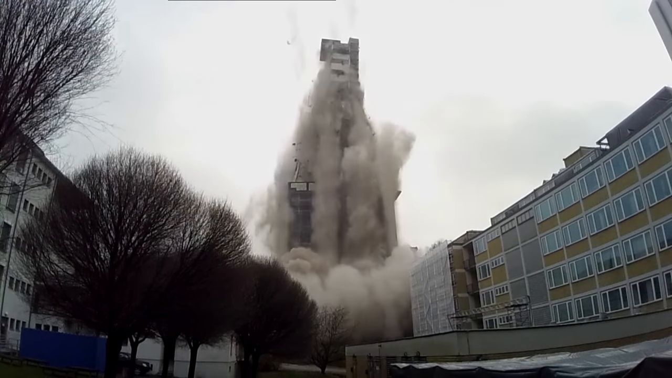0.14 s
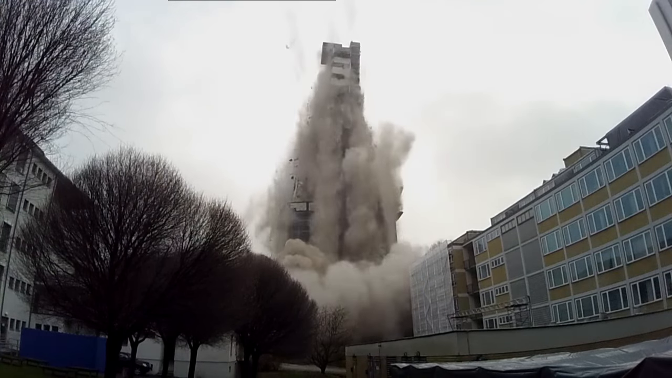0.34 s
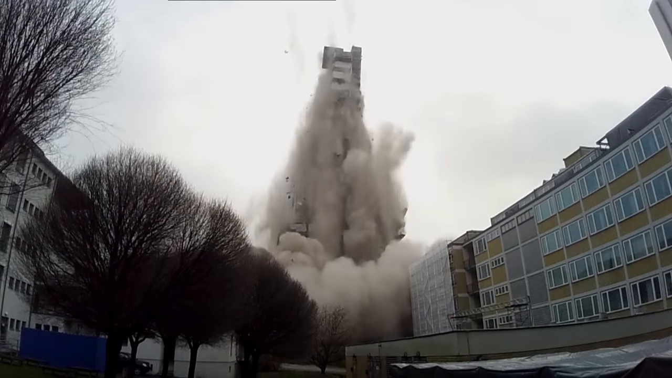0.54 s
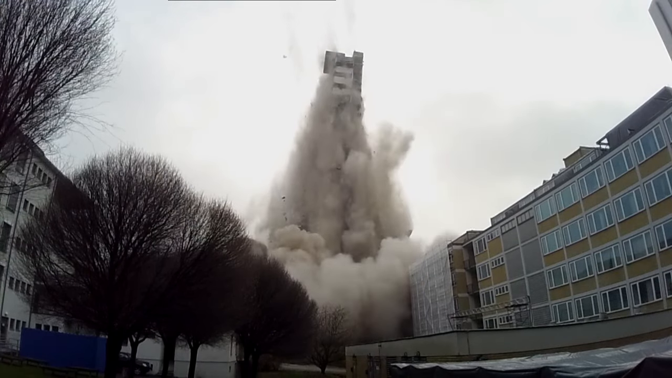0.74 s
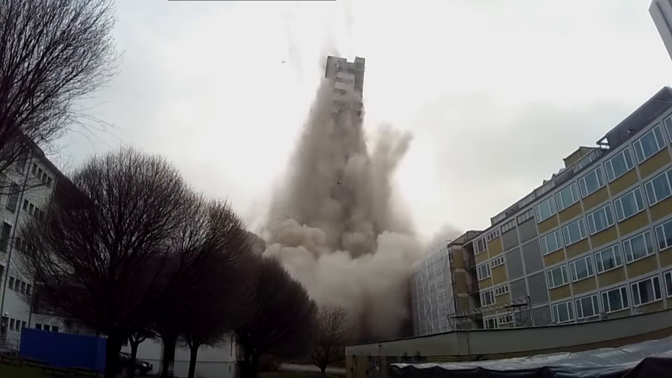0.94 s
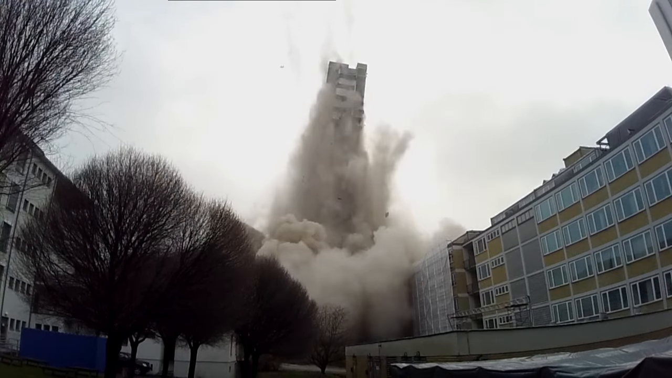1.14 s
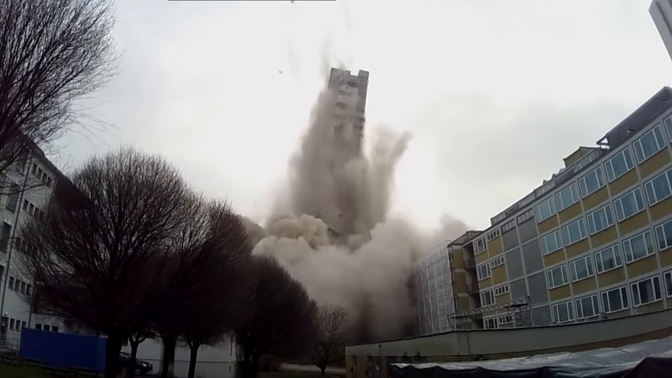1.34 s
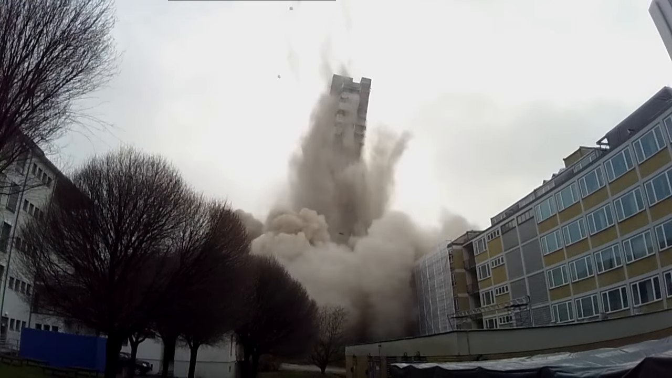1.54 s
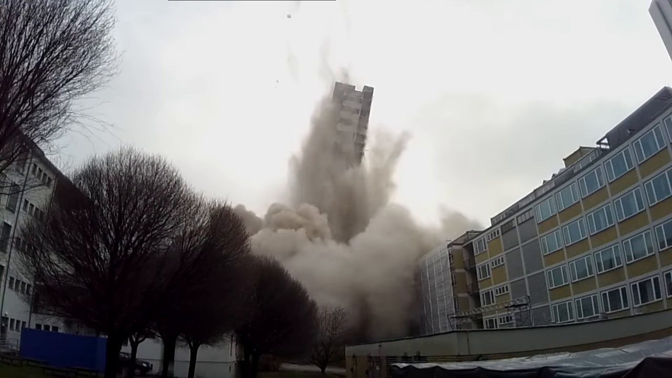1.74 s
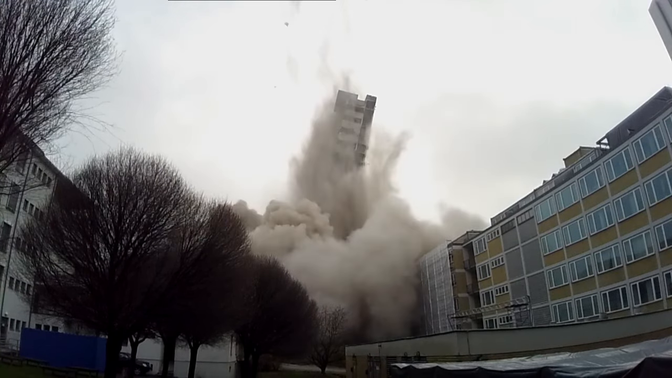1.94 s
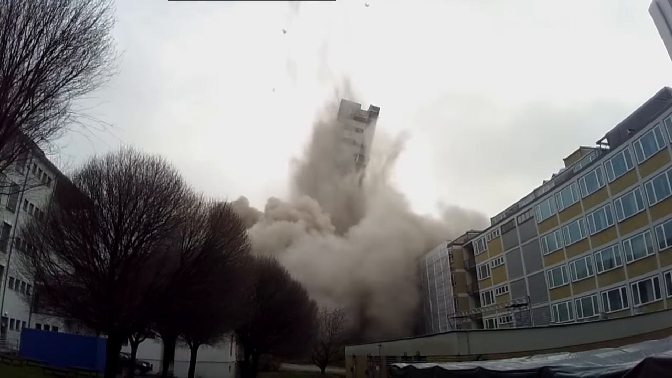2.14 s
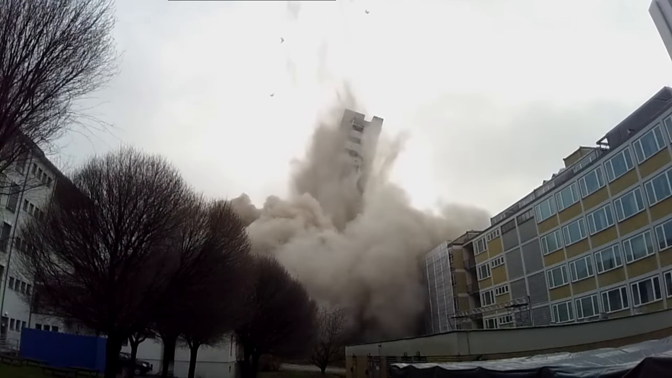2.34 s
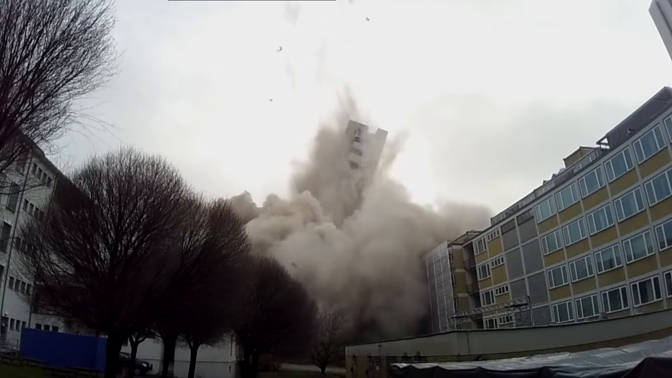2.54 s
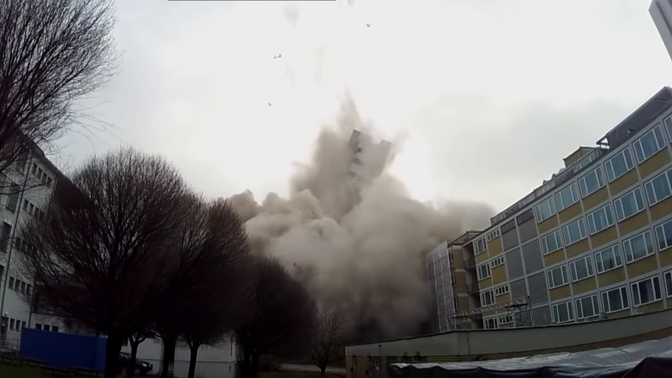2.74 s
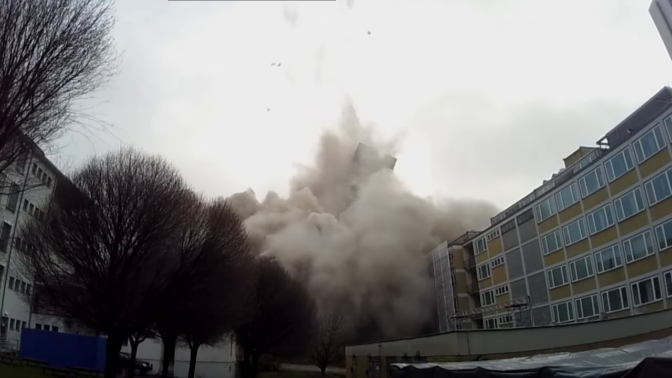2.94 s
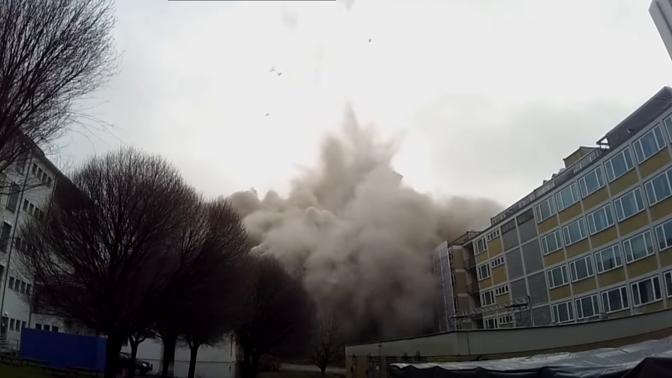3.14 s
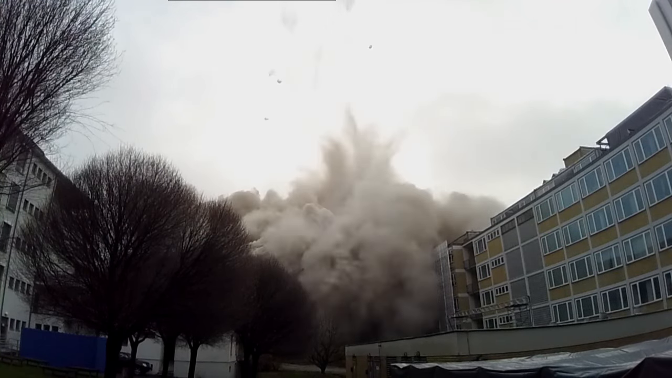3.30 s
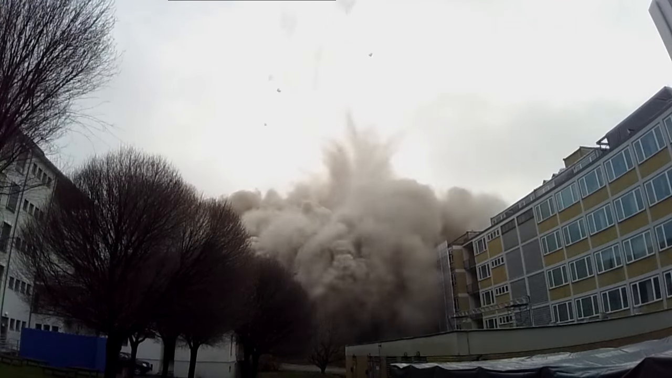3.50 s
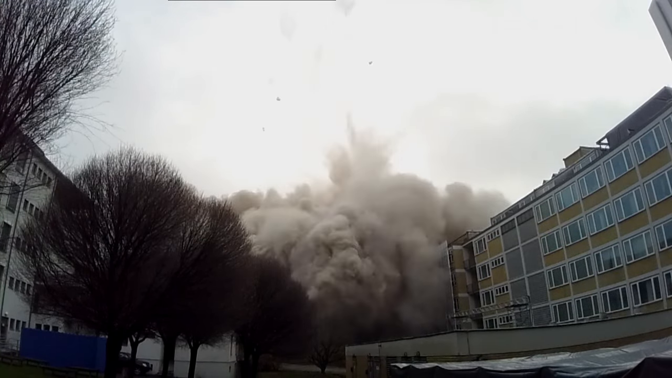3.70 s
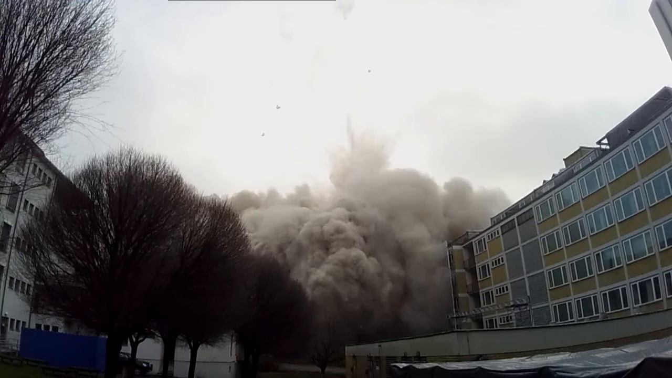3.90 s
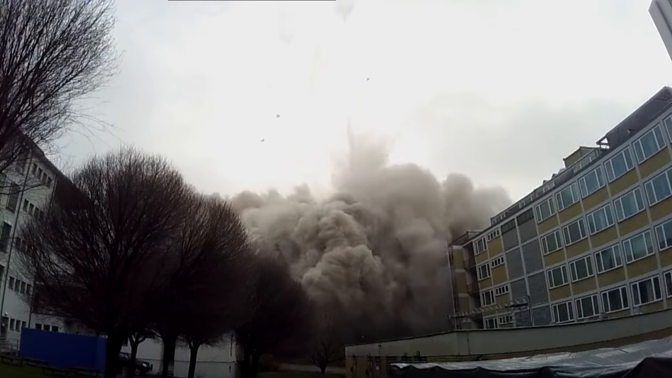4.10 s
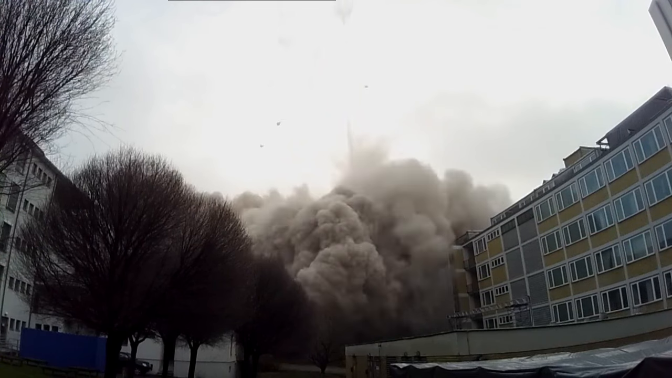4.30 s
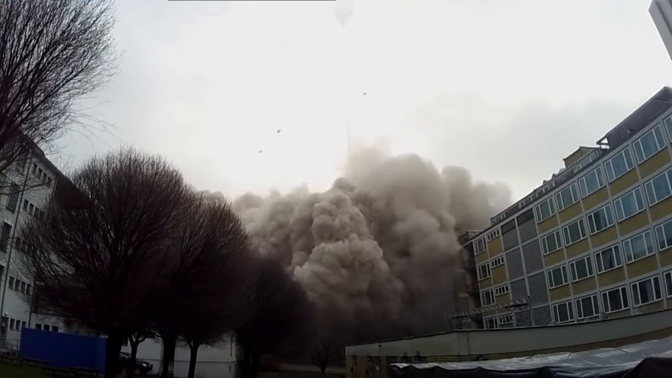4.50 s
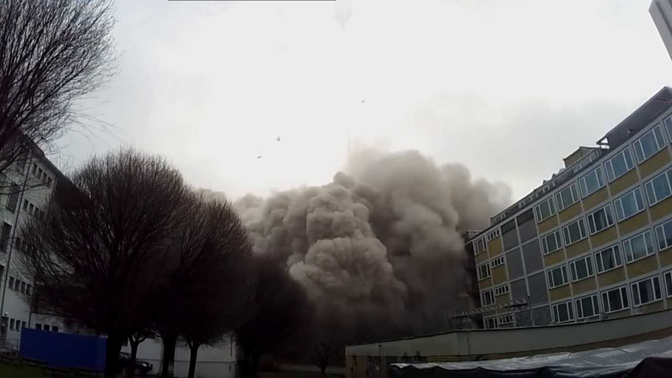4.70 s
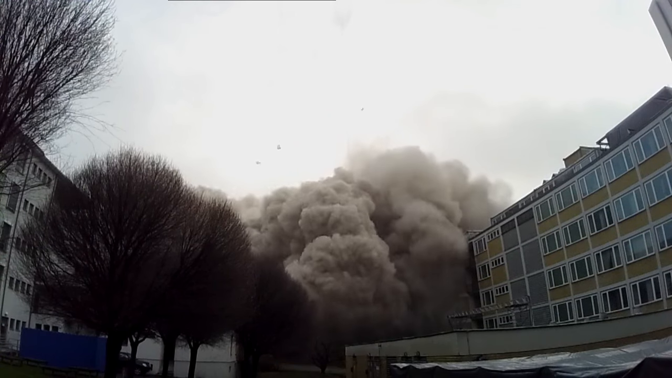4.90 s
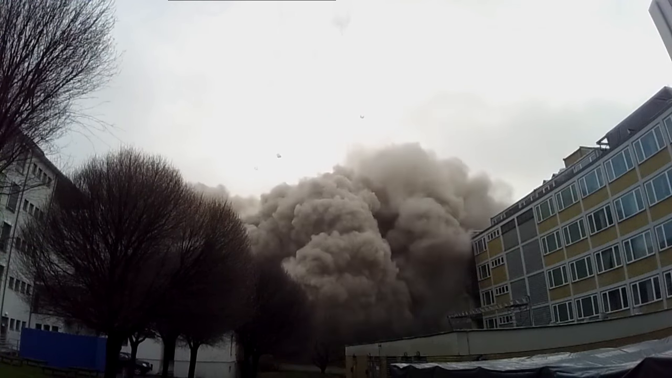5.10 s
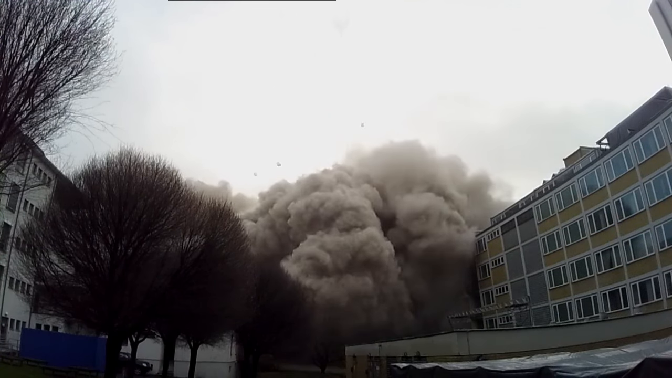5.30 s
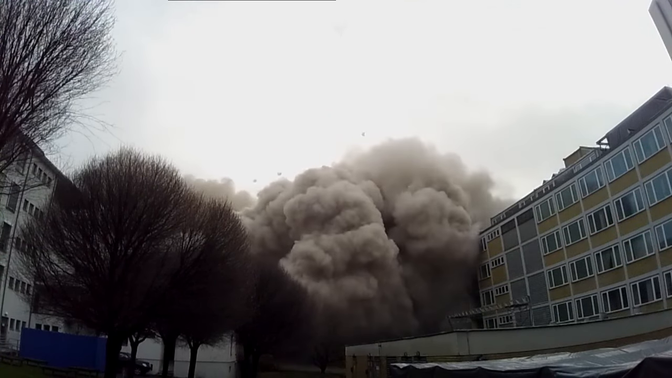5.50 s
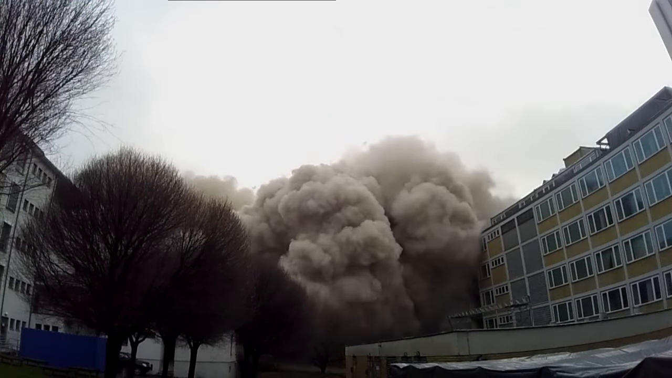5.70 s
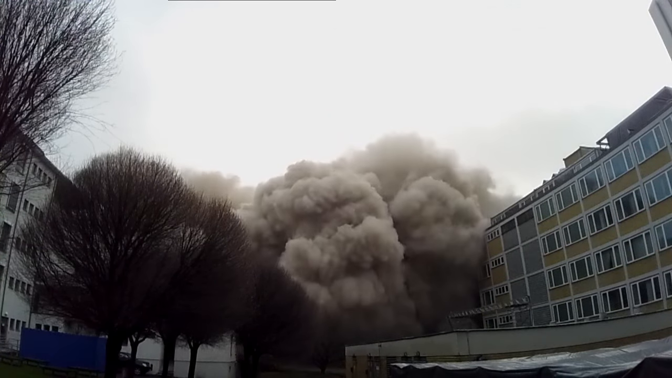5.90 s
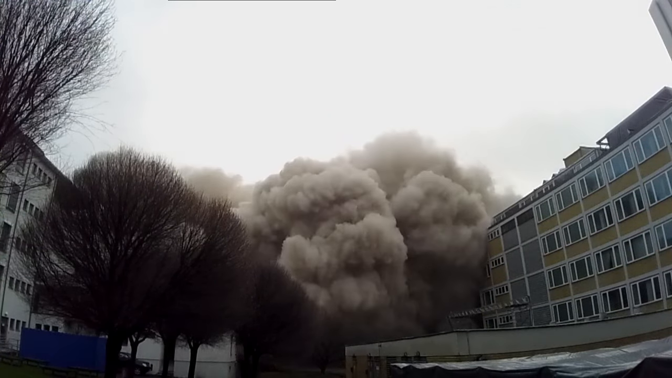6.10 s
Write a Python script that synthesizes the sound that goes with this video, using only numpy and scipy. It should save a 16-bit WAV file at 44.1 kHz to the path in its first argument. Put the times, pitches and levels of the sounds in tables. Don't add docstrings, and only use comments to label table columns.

```python
import sys
import numpy as np
from scipy import signal
from scipy.fft import rfft, irfft, next_fast_len
from scipy.io import wavfile
from scipy.ndimage import uniform_filter1d, map_coordinates

SR = 44100
rng = np.random.default_rng(int(sys.argv[2]) if len(sys.argv) > 2 else 0)


def volts_from_db(level):
    exponent = np.asarray(level, float) / 20
    return 10 ** exponent


def dump(signal):
    limited = np.clip(np.atleast_2d(signal).T, -1, 1)
    pcm = np.round(limited * 32767).astype(np.int16)
    wavfile.write(sys.argv[1], SR, pcm)


N = 271212
TIME = np.arange(N) / SR

# start_s [s], level_db [dB], drive_db over the rails [dB]
ROAR_COURSE = [(0, -17, 10), (.38, -16, 21), (.75, -16, 19), (1.05, -18, 21.5), (1.4, -17.5, 15.5),
               (1.75, -19, 8.5), (1.9, -17.5, 11), (2.2, -19, 10), (2.55, -18.5, 7.5), (3, -19.5, 1),
               (3.5, -19.5, 0), (3.8, -22.5, 2), (4.22, -21, 0.5), (4.6, -21.5, -1), (5.2, -23.5, -0.5),
               (5.41, -22.5, 1), (5.55, -23.5, -0.5), (6.15, -26, 0.5)]
# start_s [s], length_ms [ms]
FLOOR_SURGES = [(0.0224, 9), (0.076, 9.2), (0.3066, 5.4), (0.3234, 9.2), (0.4335, 4.4), (0.8943, 12),
                (1.0124, 7.6), (1.028, 10), (1.0836, 11), (1.117, 6.8), (1.1264, 6.9), (1.135, 9.1),
                (1.172, 9.9), (1.2187, 6.7), (1.2354, 14.5), (1.311, 9.7), (1.3226, 11), (1.4333, 8.4),
                (1.5795, 6.14), (1.9306, 15), (1.955, 5.7), (2.0482, 5.8), (2.0739, 6), (2.15, 11),
                (2.216, 10), (2.38, 14), (2.4315, 16.2), (2.674, 5.6), (3.6203, 5.6), (3.787, 6.5)]
# start_s [s], length_ms [ms], residue_db [dB]
LANDING_SURGES = [(3.5945, 2.9, -15), (3.61, 3, -21), (3.9602, 3.3, -35), (4.1259, 5.4, -19),
                  (4.1344, 2, -34), (4.2344, 5.2, -14), (4.3037, 5.2, -22), (4.4922, 3.4, -19),
                  (4.737, 4.2, -15), (5.1457, 7.2, -22), (5.1589, 12, -23), (5.182, 11, -23),
                  (5.2006, 21.1, -71.5), (5.225, 6.4, -26), (5.2615, 24, -28), (5.2922, 31.6, -57),
                  (5.3277, 30.1, -60), (5.364, 15, -26.5), (5.4287, 6.3, -20.5), (5.439, 22.4, -35),
                  (5.4781, 5.1, -20), (5.505, 18.2, -24), (5.55, 5.7, -23.5), (5.5796, 8.6, -21.5),
                  (5.6261, 6.6, -24.5), (5.6867, 21, -20.5), (5.72, 11.6, -24.5)]
# start_s [s], level_db over the rail [dB], t60_s [s]
SHATTER_BURSTS = [
    (3.493, -6, 0.58),
    (3.504, -1.5, 0.07),
    (3.522, -14, 0.46),
    (3.549, -16, 0.27),
    (3.6333, -6, 0.052),
    (3.641, -8.5, 0.3),
]
# pitch_hz [Hz], density_db [dB per Hz]
CRASH_SPECTRUM = [(20, -34.5), (100, 1.5), (250, 0), (600, -7.5), (1200, -11.5), (2500, -29), (5000, -25.5),
                  (9000, -31)]
# pitch_hz [Hz], density_db [dB per Hz]
BOOM_SPECTRUM = [(35, -18), (70, -4), (110, 1), (170, -4.5), (260, -13), (500, -39.5)]
# pitch_hz [Hz], density_db [dB per Hz]
RUMBLE_SPECTRUM = [(8, -24), (25, 5), (60, 1.5), (120, -6.5), (250, -28.5)]
# pitch_hz [Hz], density_db [dB per Hz]
RUBBLE_SPECTRUM = [(2500, -28.5), (4500, -5.5), (6000, 22), (9000, -34)]
# pitch_hz [Hz], density_db [dB per Hz]
GLASS_SPECTRUM = [(3500, -30), (4800, -10), (5600, 0), (7000, 0), (8200, 1), (9500, -40)]
# pitch_hz [Hz], density_db [dB per Hz]
SHAKE_SPECTRUM = [(15, -33.5), (30, -21), (60, -1.5), (90, 0.5), (120, -3.5), (180, -33.5)]
# pitch_hz [Hz], density_db [dB per Hz]
SMEAR_SPECTRUM = [(60, -3), (300, -2.5), (900, 1.5), (2000, -3.5), (4000, -8.5), (8000, -17)]
# pitch_hz [Hz], gain_db [dB]
MIC_RESPONSE = [(20, -19.5), (130, 3.5), (220, 4), (1000, 3.5), (3000, 2), (4500, -2.5), (7500, -7)]
# pitch_hz [Hz], gain_db [dB]
MIRROR_RESPONSE = [(8300, -59), (9000, -26.5), (9300, -29.5), (11800, -36), (12200, -56.5), (13500, -57),
                   (14800, -61), (15600, -77.5)]
# start_s [s], end_s [s]
LOST_BLOCK = (1.7935, 1.8543)

BAND_TOP_HZ = 8040
FLUTTER_PER_S, FLUTTER_GROWS, FLUTTER_MS = 6, 1.3, (1.8, 5)
CLEAR_S = .006
RUBBLE_DB, RUBBLE_SWELL_DB, RUBBLE_PEAK_S, RUBBLE_SPAN_S = -27, 5.5, 3.5, 3.7
BOOM_DB, BOOM_FADE_DB_PER_S = 2, 2.5
RUMBLE_DB, RUMBLE_SWING_DB = -7.5, 2
SHAKE_DB, SHAKE_LOSS = -20, .25
RAIL_KNEE = 7.1
LIMIT, LIMIT_KNEE = .32, 10
SURGE_RESIDUE_DB = -23
SMEAR_DB, SMEAR_FOLLOWS = -11.5, 0.25
SPLICE_DB = -21


def unit(x):
    return x / np.sqrt(np.mean(x ** 2) + 1e-20)


def along(points, hz):
    f, db = np.transpose(points)
    return volts_from_db(np.interp(np.log(hz + 1), np.log(f + 1), db))


def curves(rows):
    s, *columns = np.transpose(rows)
    return [np.interp(TIME, s, column) for column in columns]


def wobble(rate):
    knots = rng.standard_normal(int(N * rate / SR) + 4)
    return map_coordinates(knots, [TIME * rate])


def filtered(x, response):
    m = next_fast_len(N + 8192)
    return irfft(rfft(x, m) * response(np.fft.rfftfreq(m, 1 / SR)), m)[..., :N]


def noise(spectrum):
    return unit(filtered(rng.standard_normal(N), lambda hz: along(spectrum, hz)))


def plateau(s, ms, edge_ms):
    edge = edge_ms / 1000
    end = s + ms / 1000
    return np.interp(TIME, [s - edge, s, end, end + edge], [0, 1, 1, 0])


def body_shake():
    drive_db = curves(ROAR_COURSE)[1]
    return volts_from_db(SHAKE_DB - SHAKE_LOSS * drive_db) * noise(SHAKE_SPECTRUM)


def rubble():
    grains = volts_from_db(1.1 * wobble(240) + 0.92 * wobble(33)) * noise(RUBBLE_SPECTRUM)
    swell = np.exp(-((TIME - RUBBLE_PEAK_S) / RUBBLE_SPAN_S) ** 2)
    return volts_from_db(RUBBLE_DB + RUBBLE_SWELL_DB * swell) * unit(grains)


def shatter():
    swell = sum(volts_from_db(db - 60 * np.abs(TIME - s) / t60) * (TIME > s) for s, db, t60 in SHATTER_BURSTS)
    return swell * volts_from_db(2.8 * wobble(310)) * noise(GLASS_SPECTRUM)


def flutter(count):
    when, keep, size = rng.random((count, 3)).T
    s = when * N / SR
    drive_db = curves(ROAR_COURSE)[1][(when * N).astype(int)]
    rate = FLUTTER_PER_S * volts_from_db(FLUTTER_GROWS * drive_db)
    ms = np.interp(size, (0, 1), FLUTTER_MS)
    free = np.ones(count, bool)
    for row in FLOOR_SURGES + LANDING_SURGES:
        before = s + ms / 1000 < row[0] - CLEAR_S
        after = s > row[0] + row[1] / 1000 + CLEAR_S
        free &= before | after
    return list(np.transpose([s, ms])[free & (keep * count * SR / N < rate)])


def surges():
    waves = sorted(FLOOR_SURGES + LANDING_SURGES + flutter(count=400), key=lambda row: row[0])
    swing = 0
    for k, row in enumerate(waves):
        swing = swing + (-1) ** k * plateau(row[0] + .0008, row[1] - 1.4, edge_ms=2.14)
    return swing * (1 + 3.83 * volts_from_db(curves(ROAR_COURSE)[1]))


def collapse():
    crash = volts_from_db(0.48 * wobble(12) + 1.2 * wobble(45)) * noise(CRASH_SPECTRUM)
    boom = volts_from_db(BOOM_DB - BOOM_FADE_DB_PER_S * TIME) * noise(BOOM_SPECTRUM)
    rumble = volts_from_db(RUMBLE_DB + RUMBLE_SWING_DB * wobble(6)) * noise(RUMBLE_SPECTRUM)
    return volts_from_db(curves(ROAR_COURSE)[1]) * (crash + boom + rumble)


def scene():
    return (rubble() + shatter() + surges() + collapse())[None]


def soft_limit(x, knee):
    return x / (1 + np.abs(x) ** knee) ** (1 / knee)


def microphone(pressure):
    def response(hz):
        first_stage = 1j * hz / (1j * hz + 680)
        second_stage = (1j * hz) ** 2 / ((1j * hz) ** 2 + 1.3j * hz * 220 + 220 ** 2)
        return first_stage * second_stage * along(MIC_RESPONSE, hz)

    return unit(filtered(soft_limit(pressure, RAIL_KNEE), response))


def smeared_narrow_band(x):
    pinned = [(s, ms, SURGE_RESIDUE_DB) for s, ms in FLOOR_SURGES] + LANDING_SURGES
    clean_db = sum(1.3 * (db + 17) * plateau(s + .0025, max(ms - 4, 0), edge_ms=2.2)
                   for s, ms, db in pinned)
    moment = np.sqrt(np.abs(uniform_filter1d(x ** 2, size=180)))
    x = x + volts_from_db(clean_db + SMEAR_DB) * moment ** SMEAR_FOLLOWS * noise(SMEAR_SPECTRUM)

    hz, t, z = signal.stft(x, SR, nperseg=2048)
    local = uniform_filter1d(np.abs(z), size=15, axis=0)
    patches = uniform_filter1d(rng.standard_normal(z.shape), size=12, axis=0)
    patches = unit(uniform_filter1d(patches, size=2, axis=1))
    step_db = np.interp(hz, [1500, 4300, 4700, 6000, 8200], [-24, -9, -4, -5, 0])[:, None]
    step_db = step_db + .7 * t + 7 * patches
    weak = np.abs(z) < local * volts_from_db(step_db)
    dropped = signal.istft(z * weak, SR, nperseg=2048)[1][:N]

    x = x - np.minimum(volts_from_db(clean_db), 1) * dropped
    x = x * np.minimum(volts_from_db(clean_db + 6.5), 1)
    edge_hz, edge_db = [-200, 0, 120, 230, 330], [0, -6, -22, -30, -90]
    return filtered(x, lambda f: volts_from_db(np.interp(f - BAND_TOP_HZ, edge_hz, edge_db)))


def resampling_mirror(x):
    mirror = x * np.cos(2 * np.pi * 16300 * TIME)
    return filtered(mirror, lambda hz: along(MIRROR_RESPONSE, hz) * (hz > BAND_TOP_HZ))


def lose_block(x):
    start, end = LOST_BLOCK
    inside = (TIME > start) & (TIME < end)
    remnant = volts_from_db(-27.5 - 1100 * np.abs(TIME - start - .008))
    near = np.minimum(np.abs(TIME - start), np.abs(TIME - end))
    return (x + volts_from_db(SPLICE_DB - 20000 * near)) * np.where(inside, remnant, 1)


def top_cut(x):
    return signal.sosfilt(signal.butter(12, 15600, fs=SR, output="sos"), x)


def record(dry):
    level = volts_from_db(curves(ROAR_COURSE)[0])
    x = microphone(dry[0]) + body_shake()
    x = soft_limit(x * level / LIMIT, LIMIT_KNEE) * LIMIT / level
    x = smeared_narrow_band(x) * level
    x = x + resampling_mirror(x)
    x = lose_block(x) * np.minimum(TIME / .003, 1)
    return top_cut(x[None])


dry = scene()
out = record(dry)
dump(out)
```